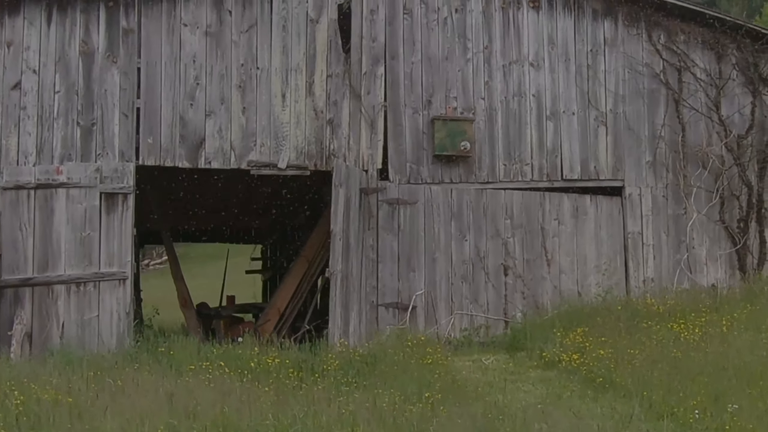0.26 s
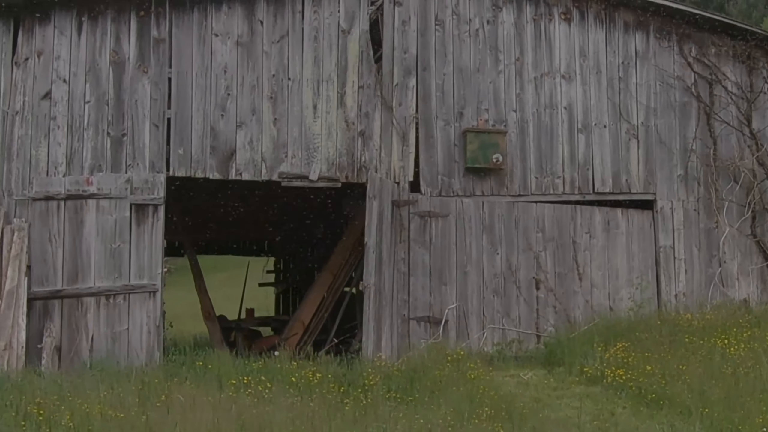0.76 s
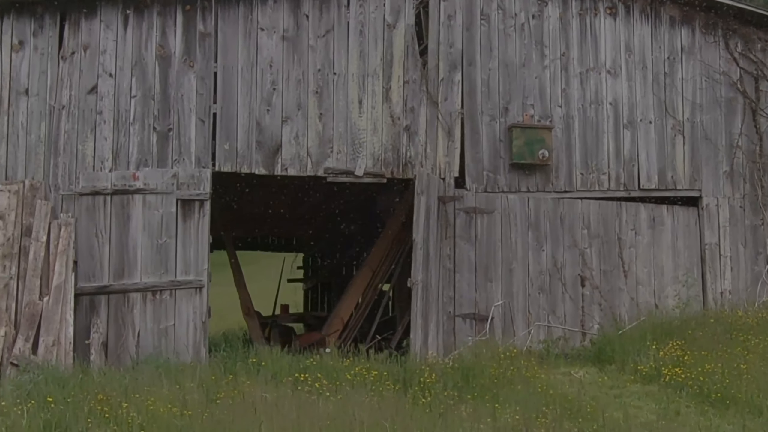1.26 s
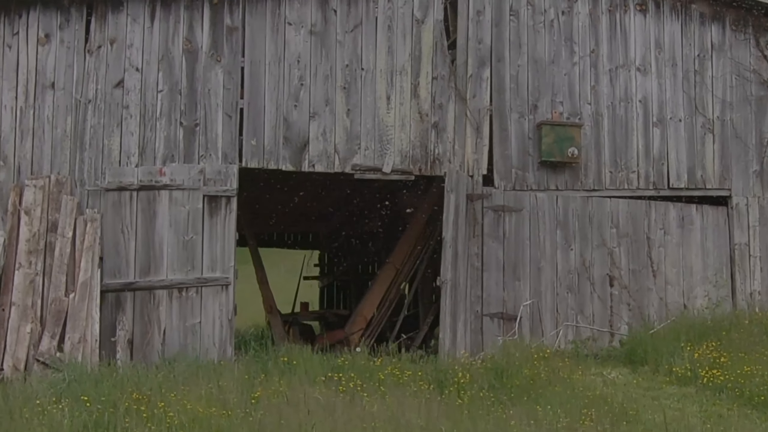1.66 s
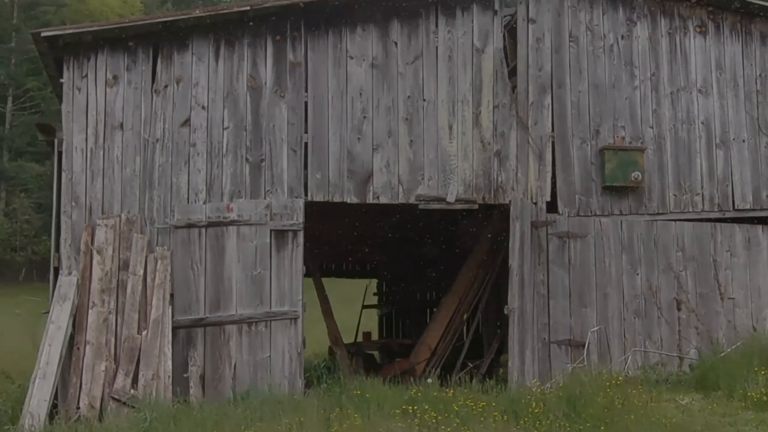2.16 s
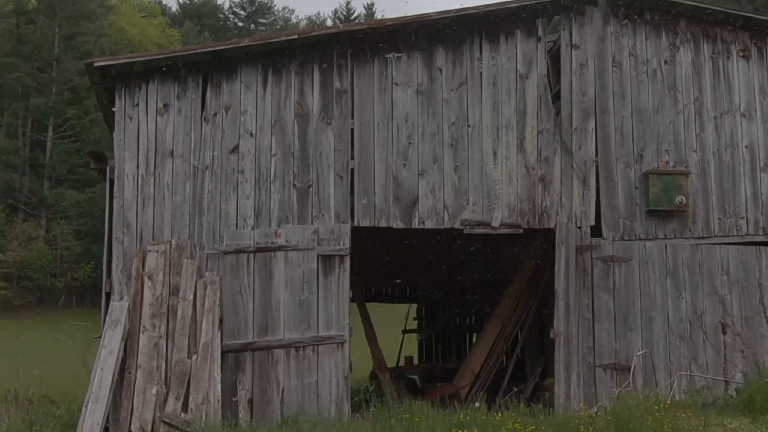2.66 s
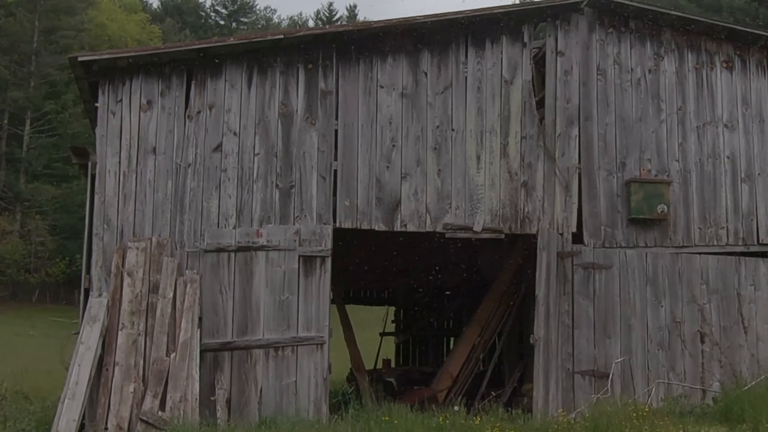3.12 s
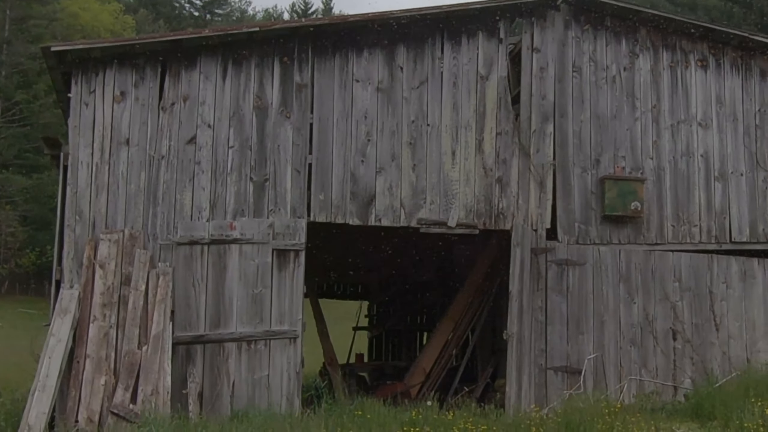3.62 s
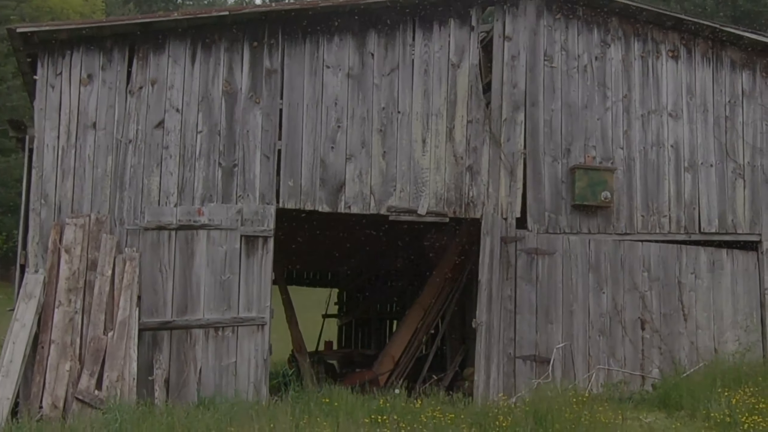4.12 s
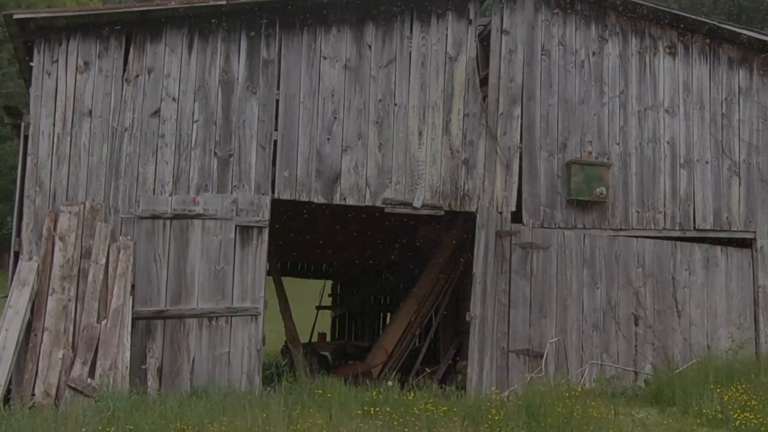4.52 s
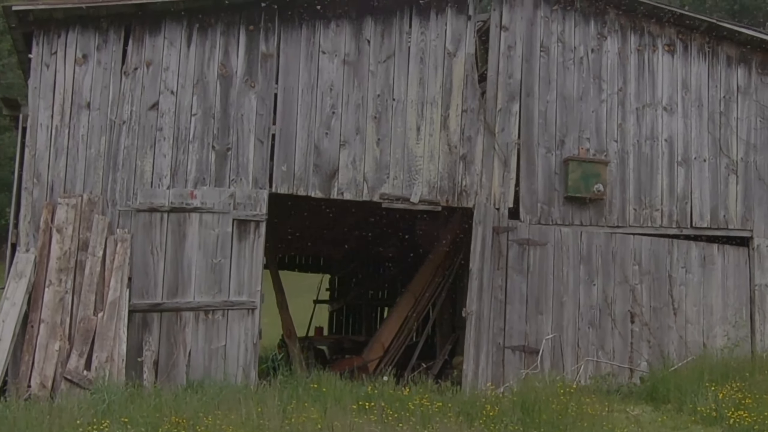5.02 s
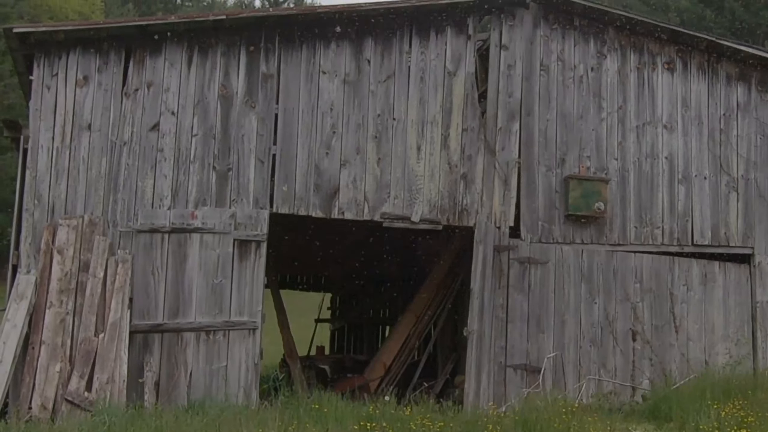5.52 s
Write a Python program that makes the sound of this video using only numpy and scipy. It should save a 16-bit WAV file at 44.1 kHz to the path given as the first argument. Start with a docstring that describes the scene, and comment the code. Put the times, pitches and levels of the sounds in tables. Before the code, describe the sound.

Outdoor microphone exposed to gusts: deep rumble and soft thuds under a dense bee hum and light leafy hiss. Distant bird whistles echo softly in the first second, then become sparse. Small dry ticks and snaps sound nearby. A close bee buzzes past twice; during the second pass a hard thump overloads the microphone, with a click slightly earlier on the left, and the quieted background creeps back.

```python
"""A swarm hums in a meadow by a wooden barn, many wavering wing beats over rushing air; wind noise buffets the microphone.
First come far chirps, hoarse twitter and a trill (sliding whistles with echoes), among snaps and ticks (short rings).
About a second in, a bee flies close, its sharp wing strokes ringing resonances; chirps and twitter then come sparsely.
On its second pass the microphone is knocked by pressure pushes and overloads; gain control ducks everything.
The level creeps back to hum, gusts and faint twitter."""
import sys
import numpy as np
from scipy import signal
from scipy.fft import rfft, irfft
from scipy.io import wavfile
from scipy.ndimage import uniform_filter1d, minimum_filter1d

SR = 44100
rng = np.random.default_rng(int(sys.argv[2]) if len(sys.argv) > 2 else 0)


def transcribe(u):
    """Save the signal u as a 16-bit wav file named by the first command-line argument.

    u: samples, shape (n,) or (channels, n), limited to [-1, 1]; the rate is SR.
    q: integer samples, one column per channel.
    """
    v = np.clip(np.atleast_2d(u).T, -1, 1)
    q = np.round(v * 32767).astype(np.int16)
    wavfile.write(sys.argv[1], SR, q)


N = 254898  # samples
STEP = 441  # samples between points of slow chance


def amp(db):
    """Decibels to gain."""
    return 10 ** (np.asarray(db) / 20)


def evened(x):
    """Scale to rms 1 over everything given."""
    return x / np.sqrt(np.mean(x ** 2) + 1e-20)


def read(points, hz):
    """Level of a spectrum in dB, straight between its points on a log axis."""
    point_hz, level_db = np.transpose(points)
    return np.interp(np.log(hz + 1), np.log(point_hz + 1), level_db)


def column(rows, index):
    """One column of a time table, drawn as straight lines over the whole scene."""
    rows = np.array(rows)
    return np.interp(np.arange(N) / SR, rows[:, 0], rows[:, index])


def add(mix, start_s, sound):
    """Lay a sound into the mix, cut off at the end of the scene."""
    part = mix[..., round(start_s * SR):][..., :sound.shape[-1]]
    part += sound[..., :part.shape[-1]]


def noise(spectrum):
    """Steady noise of the given colour, rms 1."""
    hz = np.fft.rfftfreq(N, 1 / SR)
    white = rfft(rng.standard_normal(N))
    return evened(irfft(white * amp(read(spectrum, hz)), N))


def drift(count, per_s):
    """Slow smooth chance, one row each, rms 1, a hundred points a second."""
    rows = rng.standard_normal((count, N // STEP + 2))
    width = max(round(50 / per_s), 1)
    once = uniform_filter1d(rows, width, axis=1)
    return evened(uniform_filter1d(once, width, axis=1))


def smooth_noise(count, width):
    """White noise averaged over a sliding width in samples."""
    return uniform_filter1d(rng.standard_normal(count), width)


def ring(x, hz, width_hz):
    """A fixed resonance of gain 1: one decaying complex pole."""
    pole = np.exp((2j * np.pi * hz - np.pi * width_hz) / SR)
    return 2 * signal.lfilter([1 - abs(pole)], [1, -pole], x).real


# Level of the whole background, hum and hiss rising and dropping together:
# start_s [s], level_db [dB, the hum]
BACKGROUND_LEVEL = [(0.0, -38), (.5, -40), (1.07, -36), (1.33, -35.5), (1.5, -35.5), (1.63, -40),
                    (1.85, -42), (2.3, -39.5), (2.85, -39), (3.3, -36.5), (3.55, -35.5), (3.85, -37.5),
                    (4.3, -35), (4.7, -37.5), (5.1, -39), (5.4, -37.5), (5.78, -35)]
# Colour of the hiss of grass and leaves: pitch_hz [Hz], level_db [dB per Hz]
HISS_COLOUR = [(1470, -36), (2500, -11), (3370, 1.5), (4240, -17), (8640, -6), (13300, -12), (15900, -20),
               (16500, -44)]
HISS_DB, HISS_SAME = -15, 0.99  # dB relative to the hum; left-right likeness


def hiss():
    """Wide, smooth noise of grass and leaves, a little different at the two ports."""
    common, apart = noise(HISS_COLOUR), noise(HISS_COLOUR)
    middle = np.sqrt((1 + HISS_SAME) / 2) * common
    side = np.sqrt((1 - HISS_SAME) / 2) * apart * np.array([[1], [-1]])
    return amp(column(BACKGROUND_LEVEL, index=1) + HISS_DB) * (middle + side)


# Faint hoarse twitter further off: start_s [s], length_s [s], pitch_hz [Hz], glide_hz [Hz], level_db [dB]
TWITTER = [(0.023, 0.028, 3730, 600, -46), (.092, .15, 4620, 150, -56), (.13, 0.015, 2970, 0, -46),
           (0.222, .025, 3180, 0, -49), (0.292, 0.03, 2950, 598, -47), (0.323, 0.035, 3280, -200, -45),
           (0.382, 0.055, 3500, 98, -51), (.46, .035, 3220, 100, -52), (0.515, .03, 3330, 150, -53),
           (0.564, 0.044, 2930, 200, -46), (.585, 0.054, 3250, 100, -48), (0.766, 0.034, 3050, 100, -49),
           (0.85, 0.016, 3400, 0, -42), (2.294, 0.26, 3500, 15, -52), (2.52, 0.25, 3450, 0, -53),
           (3.86, .26, 3550, 50, -51), (4.64, .06, 3650, 0, -50), (4.7, .09, 3400, -350, -47),
           (4.72, .2, 3520, -50, -53), (5.19, 0.2, 3450, 7, -54)]


def twitter(start_s, length_s, pitch_hz, glide_hz, level_db):
    """A sliding whistle roughened by slow noise on its loudness."""
    count = round(length_s * SR)
    rough = .8 * evened(smooth_noise(count, 110)) + .7
    hz = pitch_hz + glide_hz * np.linspace(-.5, .5, count)
    whistle = np.sin(2 * np.pi * np.cumsum(hz) / SR)
    return start_s, amp(level_db) * rough * whistle * np.hanning(count) ** .5


TRILL_S, TRILL_LENGTH_S, TRILL_PER_S = .787, .24, 70  # start, length, notes a second
TRILL_HZ, TRILL_SAG_HZ = 2830, 170  # centre pitch at the start, and its drop by the end
TRILL_DB, TRILL_FADE_DB = -39, 6


def trill():
    """A hoarse, sagging whistle chopped into quick regular notes that each slide upwards."""
    t = np.arange(0, TRILL_LENGTH_S, 1 / SR)
    hz = TRILL_HZ - TRILL_SAG_HZ * t / TRILL_LENGTH_S
    beat = (t * TRILL_PER_S) % 1
    note = 0.35 + np.sin(np.pi * np.clip(beat / .6, 0, 1)) ** 2
    hoarse = 1 + .4 * evened(smooth_noise(len(hz), 60))
    whistle = np.sin(2 * np.pi * np.cumsum(hz * (1 + .25 * (beat - .3))) / SR)
    level = amp(TRILL_DB - TRILL_FADE_DB * t / TRILL_LENGTH_S)
    return TRILL_S, level * note * hoarse * whistle * signal.windows.tukey(len(t), .25)


# Bird chirps: start_s [s], length_s [s], first_hz [Hz], last_hz [Hz], bend [over 1 slides late],
# level_db [dB], swell_db [dB over the note]
CHIRPS = [(.04, .056, 3150, 4350, .9, -39, -10), (.352, .028, 3520, 3050, 1.3, -38, 0),
          (.397, .021, 2650, 2880, .9, -42, 0), (.7, .045, 3610, 3770, .4, -38, 3),
          (1.708, .08, 3640, 3830, .8, -55, -6), (.812, .058, 3660, 3780, .5, -53, -3),
          (1.855, .05, 3650, 3750, 1, -59, 0), (.565, .105, 7700, 5000, 9, -50, 3),
          (1.152, .07, 7490, 6300, 4, -57, 8), (.145, .085, 6920, 6960, 1, -61, 5),
          (.465, .07, 6950, 6920, 1, -62, 0), (.685, .028, 6830, 6750, 1, -58, 0),
          (.87, .045, 6800, 6790, 1, -59, 8), (.94, .038, 6810, 6770, 1, -57, 0),
          (1.05, .085, 6870, 6860, 1, -59, 0), (1.96, .035, 5430, 5480, 1, -62, 0),
          (2.678, .014, 3700, 4700, 1, -49, -12), (2.692, .02, 5000, 7900, 1, -57, 5),
          (2.71, .018, 7950, 8050, 1, -55, -4)]
STEADY_SLIDE = .17  # share of every slide that runs evenly through the note


def chirp(start_s, length_s, first_hz, last_hz, bend, level_db, swell_db):
    """A near-pure sliding whistle with soft ends."""
    u = np.linspace(0, 1, round(length_s * SR))
    slide = STEADY_SLIDE * u + (1 - STEADY_SLIDE) * u ** bend
    hz = first_hz + (last_hz - first_hz) * slide
    whistle = np.sqrt(2) * np.sin(2 * np.pi * np.cumsum(hz) / SR)
    level = amp(level_db + swell_db * (u - .5))
    return start_s, level * whistle * signal.windows.tukey(len(u), .4)


def echo(birds):
    """Barn wall and trees answer the birds with a dense decaying tail."""
    count, t60_s = 6000, .18
    tail = rng.standard_normal(count) * amp(-60 * np.arange(count) / SR / t60_s)
    return amp(-7.5) * signal.oaconvolve(birds, tail / np.linalg.norm(tail))[:N]


# Gusts that hit the microphone: peak_s [s], die_s [s per 10 dB on either side],
# flutter_db [dB], thuds_db [dB]
GUSTS = [(.125, .025, -17, -31), (.32, .05, -32, -52), (.52, .03, -33, -55), (.8, .04, -29, -50),
         (.89, .035, -18, -36), (1.075, .05, -26, -35), (1.25, .04, -22, -48), (1.38, .06, -26, -37),
         (1.73, .05, -25, -42), (1.89, .06, -27, -37), (2.18, .04, -29, -40), (2.31, .06, -26, -36),
         (2.49, .04, -29, -47), (2.88, .05, -21, -50), (3.1, .1, -27, -47), (3.335, .03, -15, -32),
         (3.49, .04, -22, -37), (4.14, .05, -23, -38), (4.53, .05, -24, -45), (4.72, .07, -23, -50),
         (4.97, .07, -21, -32), (5.31, .04, -27, -52), (5.55, .04, -26, -49), (5.73, .03, -31, -50)]


def gusts(calm_db, index):
    """Gain of a wind layer: a calm level plus a peak at every gust."""
    t = np.arange(N) / SR
    return amp(calm_db) + sum(amp(row[index] - 10 * abs(t - row[0]) / row[1]) for row in GUSTS)


# Slow buffeting, set low around the knock to leave room for its pushes: start_s [s], level_db [dB]
BUFFET_LEVEL = [(0, -22), (.13, -12), (.7, -11), (.83, -20), (.98, -11), (1.6, -10.5), (1.9, -14),
                (2.5, -11.5), (2.76, -17), (2.9, -11), (3.25, -17), (3.45, -14), (3.585, -28), (3.71, -28),
                (3.8, -8), (4.6, -6), (4.96, -13), (5.1, -10.5), (5.78, -11.5)]
# Colours of slow pressure swings, quicker flutter and thuds: pitch_hz [Hz], level_db [dB per Hz]
BUFFET = [(1, -9), (3, 2.5), (9, 2.5), (17, -6.5), (24, -10.5), (32, -44), (60, -79.5)]
FLUTTER = [(15, -30), (25, -2), (35, 2), (55, -3), (70, -21), (100, -59), (200, -80)]
THUDS = [(40, -40), (70, -0.5), (90, 3.5), (130, -0.5), (170, -11.5), (240, -40), (400, -80)]
FLUTTER_DB, THUD_DB = -37, -55  # calm levels between gusts
WAVER_DB, WAVER_PER_S = 1.8, 8  # all wind wavers by chance


def wind():
    """Slow pressure swings, quicker flutter and thuds; eddies of like size keep each near the gust's level."""
    out = np.zeros(N)
    gains = amp(column(BUFFET_LEVEL, index=1)), gusts(FLUTTER_DB, index=2), gusts(THUD_DB, index=3)
    wavers = drift(count=3, per_s=WAVER_PER_S)
    for gain, colour, slow in zip(gains, [BUFFET, FLUTTER, THUDS], wavers):
        eddies = noise(colour)
        envelope = abs(signal.hilbert(eddies))
        alike = evened(eddies / (envelope + .5) ** 0.62)  # levels out the swells of the noise
        waver = amp(WAVER_DB * np.interp(np.arange(N), np.arange(len(slow)) * STEP, slow))
        out += gain * evened(waver) * alike
    return signal.sosfilt(signal.butter(2, 190, fs=SR, output="sos"), out)  # low-pass, Hz


# Dull ticks near the microphone: start_s [s], level_db [dB], pitch_hz [Hz], t60_s [s]
TICKS = [(0.842, -25, 1340, 0.016), (0.9024, -16.5, 1550, 0.014), (0.993, -15, 1450, 0.011),
         (1.4552, -18.5, 1210, 0.013), (2.4079, -17.5, 1380, 0.017), (2.4079, -28, 3250, .01),
         (2.846, -27, 1190, 0.014), (4.4477, -25, 1010, 0.012)]
# Thin bright snaps: start_s [s], level_db [dB], pitch_hz [Hz], t60_s [s]
SNAPS = [(0.137, -28, 4620, .004), (.5865, -29, 4800, .004), (.697, -32, 5200, .005),
         (.8066, -27, 4600, .004), (.9374, -27, 4000, .004), (1.456, -25, 6550, .005),
         (2.1082, -24, 8800, .004), (2.1096, -25, 4100, 0.0057), (2.118, -29, 3200, .006)]


def tap(level_db, pitch_hz, t60_s, rough):
    """A short ring mixed with a crack of noise around the same pitch."""
    count = 1000
    t = np.arange(count) / SR
    tone = np.sin(2 * np.pi * pitch_hz * t)
    crack = .6 * evened(ring(rng.standard_normal(count), pitch_hz, .9 * pitch_hz))
    onset = np.minimum(t * pitch_hz / .35, 1)
    return amp(level_db - 60 * t / t60_s) * ((1 - rough) * tone + rough * crack) * onset


# The knock, a shove with two rebounds and then a click that reaches the left port first:
# start_s [s], left and right [pressure, 1 is full scale], rise_ms [ms], hold_ms [ms], fall_ms [ms]
PUSHES = [(3.56, .4, .4, 20, 22, 1), (3.598, 1.1, 1.1, 4, 1, 1.5), (3.6018, -2.8, -2.8, 5.5, 14, 1),
          (3.607, 3.8, 3.8, 1.6, .1, .8), (3.6212, -2, -2, 1.5, .8, 2), (3.6232, -1.1, -1.1, 2, 14, 16),
          (3.6565, 1.5, 1.5, 4.2, 2, 3), (3.66059, -5, 0, .06, .12, .35), (3.6613, 0, -3.4, .06, .03, .18),
          (3.6608, 2, .8, .5, .8, .5), (3.66195, -13, 0, .6, .05, 1.5), (3.662, 3, 3, 4, 3, 9),
          (3.668, 3, 3, 19, 2, 46)]


def knock():
    """Pressure pushes on the microphone that rise, hold and fall, with rounded corners."""
    out = np.zeros((2, N))
    for start_s, left, right, *times_ms in PUSHES:
        rise, hold, fall = (round(ms * SR / 1000) for ms in times_ms)
        shape = np.r_[np.hanning(2 * rise)[:rise], np.ones(hold), np.hanning(2 * fall)[fall:]]
        add(out, start_s, np.outer([left, right], shape))
    return out


# Partials of one wing stroke: multiple [of the wing beat], level_db [dB]
WING = [(1, -7.5), (2, -1), (3, -9), (4, -8), (5, -5.5), (6, -3.5), (8, -21.5), (11, -27), (15, -23.5),
        (19, -52.5), (30, -52)]
# Air whirring off many wings: pitch_hz [Hz], level_db [dB per Hz]
RUSH = [(71, -19), (120, -16.5), (161, -13.5), (242, -6.5), (311, -14), (481, -1), (580, -10), (1270, -9),
        (1840, -18.5), (5000, -30.5), (6500, -28), (11000, -120)]
RUSH_DB = -2  # relative to the hum
BEES, BEAT_HZ = 48, 239  # size of the crowd and its middle wing beat
BEAT_SPREAD, BEAT_WAVER = .055, .03  # scatter between bees and wavering, as shares of the beat


def swarm():
    """Each bee repeats one wing stroke at its own wavering rate and comes nearer or goes; air rushes under them."""
    k, cycle = np.arange(1, 31), np.arange(1024) / 1024
    coarse, fine = np.arange(N // STEP + 2) * STEP, np.arange(N)
    scatter = BEAT_SPREAD * rng.standard_normal((BEES, 1))
    beat_hz = BEAT_HZ * (1 + scatter + BEAT_WAVER * drift(BEES, per_s=3))
    near = amp(5.03 * drift(BEES, per_s=2.87))
    hum = np.zeros(N)
    for hz, gain in zip(beat_hz, near):
        phase = np.outer(k, cycle) + rng.random((30, 1))
        stroke = amp(read(WING, k)) @ np.cos(2 * np.pi * phase)
        turns = np.cumsum(np.interp(fine, coarse, hz)) / SR
        hum += np.interp(fine, coarse, gain) * stroke[(turns * 1024).astype(int) % 1024]
    return amp(column(BACKGROUND_LEVEL, index=1)) * (evened(hum) + amp(RUSH_DB) * noise(RUSH))


# Fly-bys of the close bee: near_s [s, nearest from], until_s [s], top_s [s, a top of its beat],
# first_hz [Hz, wing beat before surges], last_hz [Hz], level_db [dB, before surges]
CLOSE = [(1.08, 1.5, 1.198, 279, 297, -39.5), (3.32, 3.64, 3.448, 288, 295, -35.5)]
# Rings at each close wing stroke: pitch_hz [Hz], width_hz [Hz], level_db [dB]
BODY = [(295, 60, 3), (1480, 220, 13.5), (2950, 700, -2.5), (3750, 950, -1), (5500, 400, -22)]
COME_DB_PER_S, GO_DB_PER_S, FAINT_DB = 170, 80, 14  # heard until this far below the nearest level
# the beat climbs for a share of each surge and drops back; loudness follows
SURGE_S, CLIMB, SURGE_HZ, SURGE_DB = .093, .72, 19, 3


def close_bee(near_s, until_s, top_s, first_hz, last_hz, level_db):
    """Uneven wing strokes ring resonances near the microphone; each partial fades in and out as the bee turns."""
    t = np.arange(near_s - FAINT_DB / COME_DB_PER_S, until_s + FAINT_DB / GO_DB_PER_S, 1 / SR)
    count = len(t)
    surge = np.interp((t - top_s) / SURGE_S % 1, [0, 1 - CLIMB, 1], [.5, -.5, .5])
    beat_hz = np.interp(t, [near_s, until_s], [first_hz, last_hz]) + SURGE_HZ * surge
    coming_db = np.maximum(COME_DB_PER_S * (near_s - t), 0)
    going_db = np.maximum(GO_DB_PER_S * (t - until_s), 0)
    turns = np.cumsum(beat_hz * (1 + 0.049 * smooth_noise(count, 200))) / SR
    turning = uniform_filter1d(rng.standard_normal((20, count)), 900, axis=1)
    turning = evened(uniform_filter1d(turning, 900, axis=1))
    strokes = sum(amp(2.2 * turning[k - 1]) * np.cos(2 * np.pi * k * turns) for k in range(1, 21))
    rasp = np.exp(-(turns % 1) / 0.4) * rng.standard_normal(count)  # a puff of air with every stroke
    drive = evened(strokes) + .65 * evened(rasp)
    body = np.zeros(count)
    for k, (hz, width_hz, ring_db) in enumerate(BODY):
        twice = ring(ring(drive, hz, width_hz), hz, width_hz)
        body += (-1) ** k * amp(ring_db) * twice  # neighbours in opposite sign
    level = amp(level_db + SURGE_DB * surge - coming_db - going_db)
    return t[0], level * evened(body) * signal.windows.tukey(count, .04)


def scene():
    """All sources; only the hiss and the knock differ between the two ports."""
    near, far = np.zeros(N), np.zeros(N)
    for row in TWITTER:
        add(far, *twitter(*row))
    add(far, *trill())
    for row in CHIRPS:
        add(far, *chirp(*row))
    far += echo(far)
    for start_s, *hit in TICKS:
        add(near, start_s, tap(*hit, rough=0.05))
    for start_s, *hit in SNAPS:
        add(near, start_s, tap(*hit, rough=.6))
    for row in CLOSE:
        add(near, *close_bee(*row))
    return hiss() + far + wind() + near + knock() + swarm()


def gain_control(dry):
    """Gain shared by both ports falls fast on an overload, holds, and creeps back."""
    peak_db = 20 * np.log10(abs(dry).max(0) + 1e-9)
    hold = round(.3 * SR) | 1
    held_db = -minimum_filter1d(-peak_db, hold, origin=hold // 2, mode="nearest")  # highest recent peak
    fall_db = np.arange(N) * 21.3 / SR  # release of the tracked peak, 21.3 dB a second
    over_db = np.maximum(np.maximum.accumulate(held_db + fall_db) - fall_db, 0)
    lag = np.exp(-1 / (.002 * SR))  # 2 ms
    return dry / amp(signal.lfilter([1 - lag], [1, -lag], .8 * over_db))


def record(dry):
    """The microphone input: gain control, clipping, coupling and band limit."""
    ducked = gain_control(dry)
    clipped = ducked / (1 + ducked ** 8) ** (1 / 8)  # straight up to a round knee at full scale
    leak = np.exp(-2 * np.pi * 4 / SR)  # 4 Hz: the coupling capacitor lets a held pressure sink back
    coupled = np.clip(signal.lfilter([1, -1], [1, -leak], clipped), -.98, .98)
    band = signal.firwin(511, 16800, window=("kaiser", 9), fs=SR)  # upper edge, Hz
    return signal.oaconvolve(coupled, band[None], "same")


dry = scene()
out = record(dry)
transcribe(out)
```